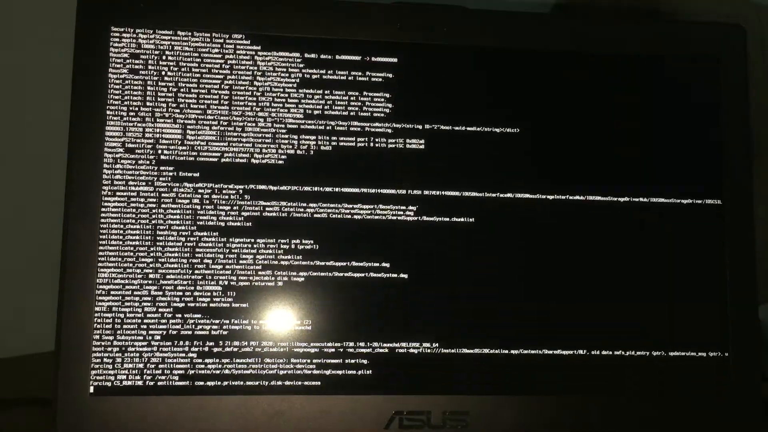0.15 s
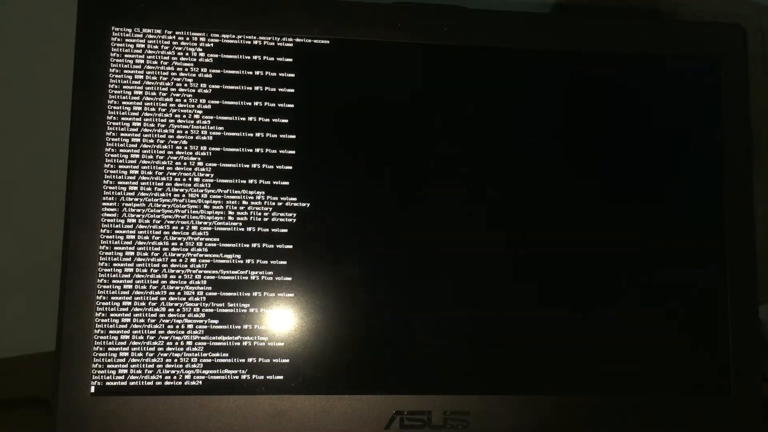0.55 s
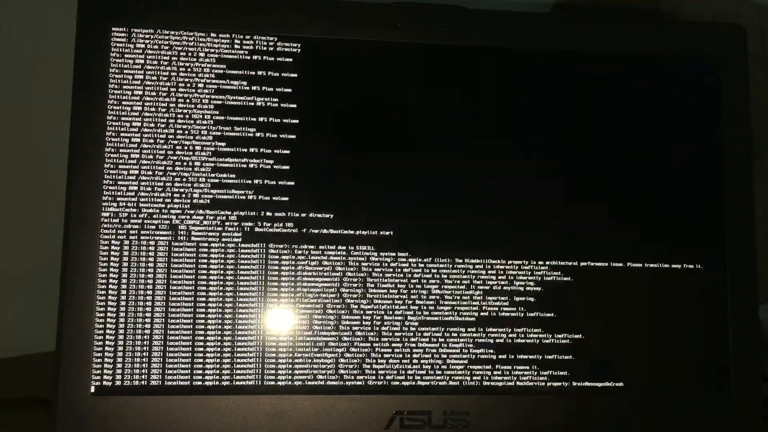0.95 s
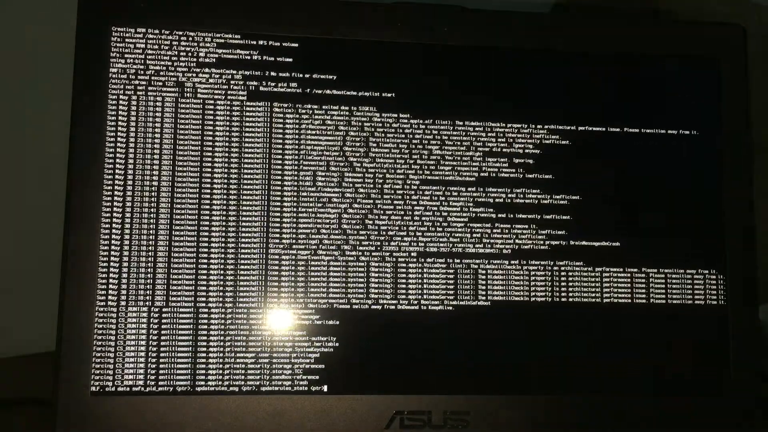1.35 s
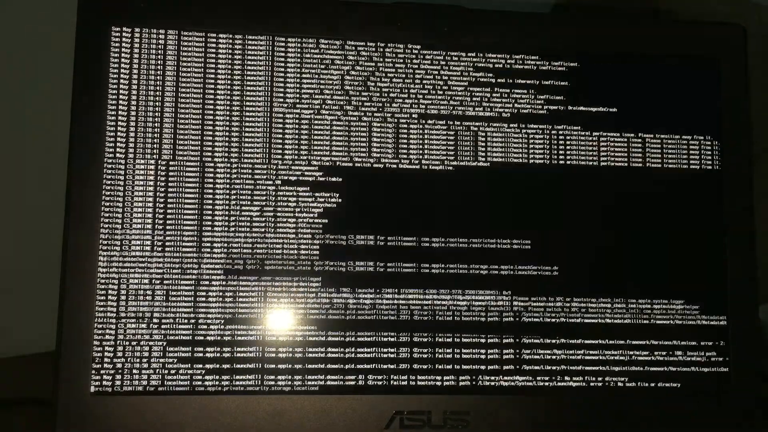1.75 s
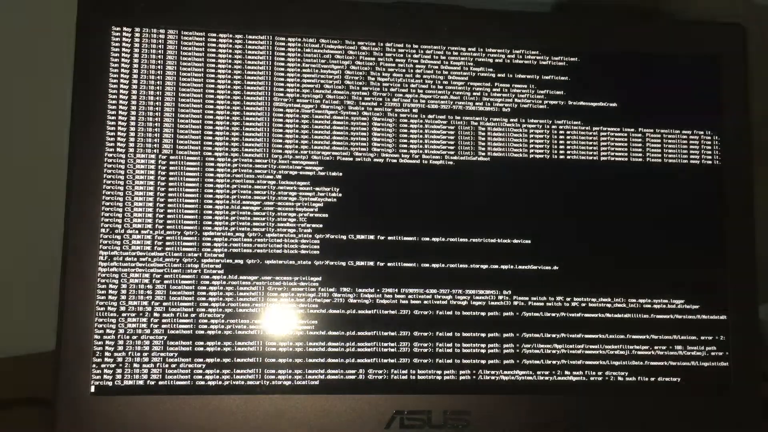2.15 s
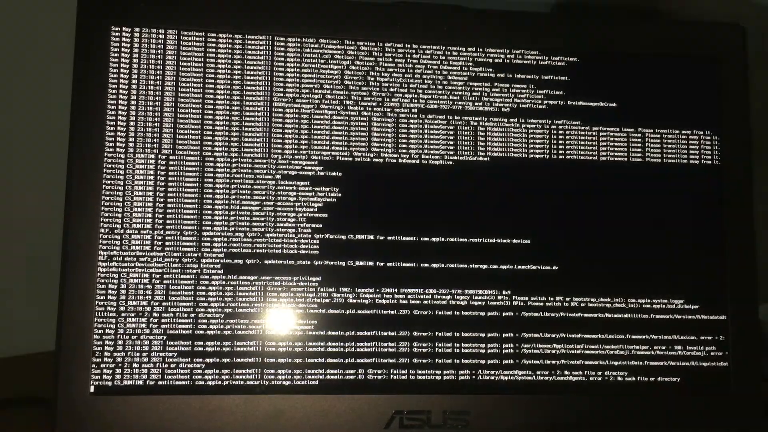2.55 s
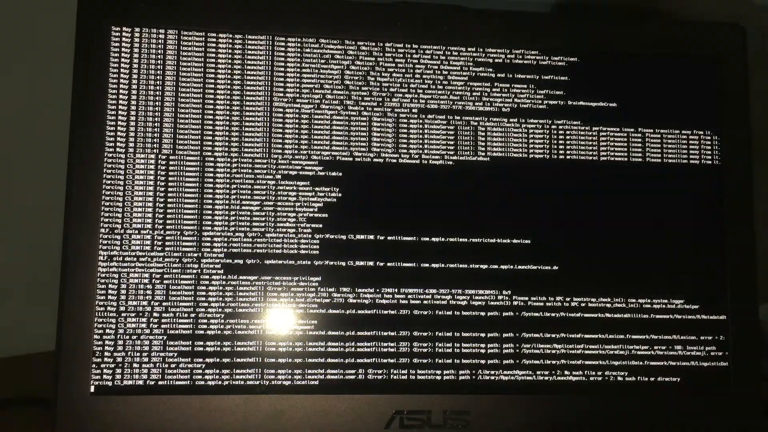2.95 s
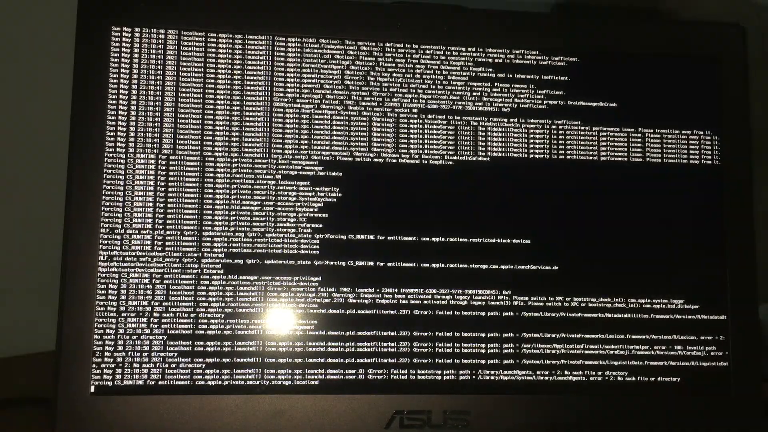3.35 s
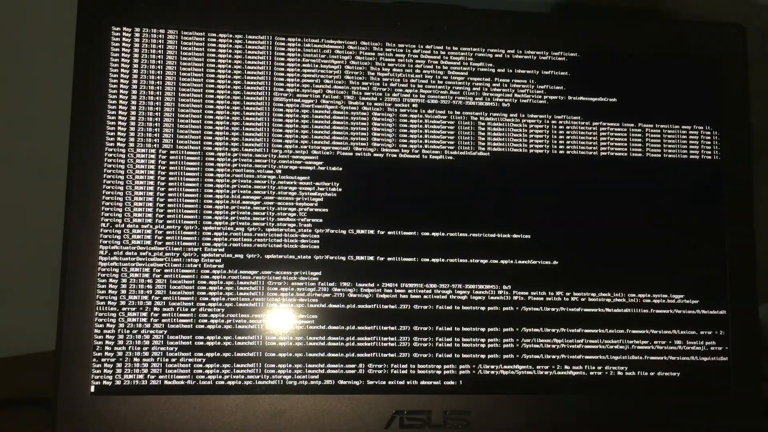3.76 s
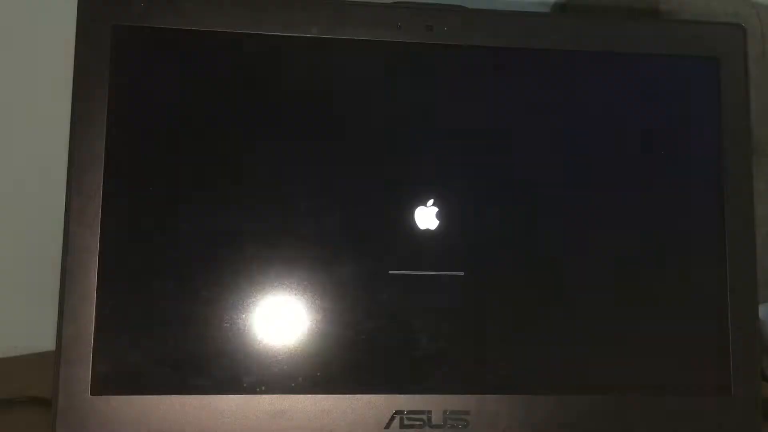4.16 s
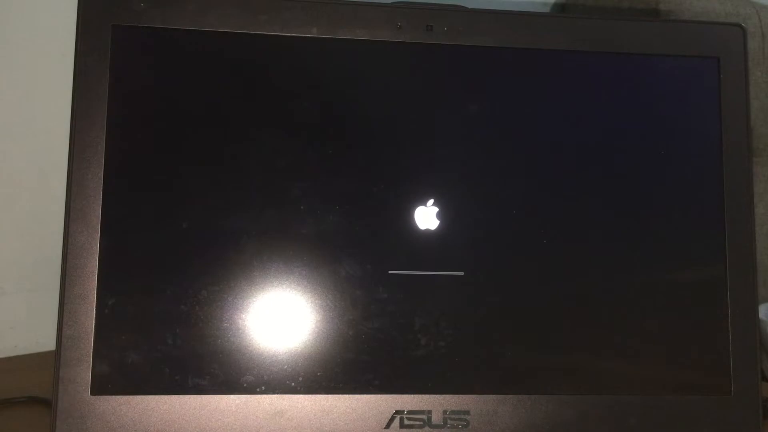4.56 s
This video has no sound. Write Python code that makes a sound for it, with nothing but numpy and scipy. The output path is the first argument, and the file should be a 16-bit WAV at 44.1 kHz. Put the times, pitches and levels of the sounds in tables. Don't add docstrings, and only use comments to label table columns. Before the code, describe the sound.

Close to an open laptop in a quiet room, fan air hisses steadily, focused in the middle treble, with thin constant whining tones. Faint low whistles swell briefly. Tiny creaks and snaps from the hand-held camera begin at once; sharper pops come around one second and again at two and a half. Small high ticks cluster near the end.

```python
import sys
import numpy as np
from scipy import signal
from scipy.fft import rfft, irfft, next_fast_len
from scipy.io import wavfile
from scipy.ndimage import uniform_filter1d, map_coordinates

SR = 44100
rng = np.random.default_rng(int(sys.argv[2]) if len(sys.argv) > 2 else 0)


def log_audio(samples):
    frames = np.atleast_2d(samples).T
    limited = np.clip(frames, -1, 1)
    pcm = np.round(limited * 32767).astype(np.int16)
    wavfile.write(sys.argv[1], SR, pcm)


def volts(x):
    e = np.asarray(x, float) / 20
    return 10 ** e


N = 208054
AIR_TOP_HZ, MIC_TOP_HZ = 15800, 16500

# pitch_hz, level_db (per Hz)
AIR_SPECTRUM = [(20, -100), (200, -101), (600, -99.5), (800, -86.5), (1100, -83.5), (1650, -90.5),
                (2200, -78), (3100, -69), (4200, -67), (5200, -77), (5800, -82.5), (7500, -88),
                (9500, -96.5), (15800, -96)]
# start_s, level_db
AIR_FLOW = [
    (0.0, -46),
    (0.47, -47),
    (1.4, -46.5),
    (3.15, -47),
    (3.97, -46.5),
    (4.72, -46.5),
]
DUCT_HZ = [740, 840, 1222, 1285, 1420, 1520, 1800, 2005, 2075, 2400, 2585, 2860, 2940, 3230, 3530, 3750,
           4020, 4330, 4590, 5300, 5685, 6424, 7510]
# width_hz, level_db (per Hz)
DUCT_SHAPES = [(50.4, -82.5), (29.5, -107), (23.7, -68.5), (73.6, -71.5), (240, -77.5), (80.4, -81),
               (204, -77.5), (18.4, -66), (89, -76), (104.4, -67.5), (100, -71.5), (77.5, -62), (74, -60.5),
               (74, -77.5), (100, -77), (207, -64.5), (40.2, -63), (61, -82.5), (210, -79), (130, -80),
               (49.4, -89.5), (120, -88), (122, -90.5)]
TONE_HZ = [977.7, 1187, 1322.8, 1889, 1921, 1943.8, 2350.5, 3065, 4019.5, 5470]
# level_db, wander_hz
TONE_LEVELS = [(-83.5, .5), (-82, .6), (-65, .5), (-84, .7), (-79.5, .7), (-75, 1.5), (-64, 1), (-78, 1.2),
               (-70, 4), (-86, 1.2)]
# start_s, pitch_hz, level_db
COIL = [
    (0, 1526, -67.5),
    (2.12, 1526, -67.5),
    (2.2, 1505, -74),
    (2.3, 1486.5, -71),
    (4.72, 1486, -71),
]
# centre_s, peak_db, half_length_s
SWELLS = [(0.03, -74, 0.058), (.175, -65, 0.0055), (0.252, -69.5, 0.042), (0.5, -75.5, 0.062),
          (.708, -71, .015), (1.51, -89, 0.028), (1.797, -72, 0.034), (1.993, -88, 0.017), (2.1, -75, 0.07),
          (2.23, -62, 0.0096), (2.303, -76, 0.079), (2.582, -62.5, 0.009), (2.778, -62.5, 0.01),
          (2.831, -60, 0.019), (3.232, -73, 0.0071), (3.542, -81, 0.055), (3.737, -75, .03),
          (3.814, -67, 0.013), (3.859, -66.5, 0.018), (3.9, -67, 0.0087), (4.024, -68, 0.01),
          (4.087, -71, 0.02), (4.264, -72, 0.027), (4.546, -66, 0.011), (4.61, -80, 0.035)]
# start_s, length_s, start_hz, middle_hz, end_hz
GLIDES = [
    (1.92, .075, 946, 847, 795),
    (2.39, .22, 800, 842, 790),
]
# start_s, peak_db
ARM_MOVES = [
    (0.229, -42),
    (3.5853, -42),
    (3.706, -41.5),
    (3.7973, -42.5),
    (3.885, -40.5),
    (4.513, -40.5),
]
# pitch_hz, level_db, decay_s (time to fall 60 dB)
ARM_MODES = [(9510, -3, .026), (11300, -4, .016), (10500, -6, .013), (12200, -7, .012), (13300, -7, .012),
             (8300, -10, .012)]
# centre_s, peak_db, pitch_hz, half_length_s
POPS = [(.627, -50, 880, .002), (.8283, -35, 2500, .0019), (1.2684, -29.5, 2350, .00105),
        (1.5186, -46, 750, .0007), (1.52, -57, 420, .003), (1.9839, -46.5, 700, .0009),
        (1.987, -60, 315, .005), (2.0712, -39, 1550, .00055), (2.245, -66, 660, .002),
        (2.5017, -30, 2150, .00038), (2.507, -42, 2500, .002), (2.543, -38, 2900, .0005)]
# start_s, peak_db,
# brightness_hz, length_s
CREAKS = [(0.0577, -39.5, 12000, 0.0061), (0.091, -51, 14000, 0.0048), (.1207, -52.5, 13000, 0.0033),
          (.1737, -48.5, 13000, 0.0055), (1.0935, -62, 11000, .005), (1.192, -48, 8550, 0.0039),
          (1.238, -61, 13500, .005), (1.517, -47, 14700, 0.0059), (1.9823, -40.5, 15600, 0.0066),
          (2.175, -54.5, 13000, .004), (2.5009, -30.5, 13100, 0.0011), (2.5024, -36, 14000, 0.0048),
          (2.506, -51, 6000, 0.022), (3.097, -51, 13700, 0.0056), (3.862, -59, 15500, .003)]
# start_s, peak_db, brightness_hz
SNAPS = [(.093, -53, 12000), (.1925, -59, 12000), (.248, -52, 15000), (.268, -63, 13000),
         (.294, -59, 12000), (.306, -52, 12500), (.407, -56, 15500), (0.5798, -56.5, 11000),
         (0.691, -56, 15000), (.7088, -59, 14000), (1.188, -60, 9800), (1.268, -54, 15100),
         (1.58, -50, 6800), (2.2425, -59, 11000), (2.383, -56, 8400), (2.488, -52, 9000),
         (2.494, -58, 13000), (2.535, -52, 7450), (2.625, -55, 10600), (2.8605, -50, 14000),
         (2.9435, -49, 12100), (3.152, -55, 14600), (3.158, -57, 14200), (3.16, -43, 14800),
         (3.26, -63, 13000), (3.849, -48, 15000), (3.8755, -45, 14700), (3.934, -57, 12000),
         (3.957, -54, 8900)]
# centre_s, peak_db, direction (+1 inward, -1 outward), width_s, body_ring_hz
PUSHES = [(0.0583, -41.5, -1, 0.00023, 296), (0.066, -56, 1, 0.00071, 198), (.121, -59, -1, 0.00042, 297),
          (0.174, -51, -1, 0.00029, 286), (0.192, -64, -1, 0.00043, 300), (0.463, -64.5, 1, 0.00034, 400),
          (1.095, -55, -1, 0.00015, 540), (1.518, -51, -1, 0.00053, 390), (1.526, -63, 1, 0.00074, 200),
          (1.58, -73, -1, .0007, 300), (1.9843, -58.5, 1, 0.00086, 317), (2.175, -67, -1, 0.00046, 500),
          (2.49, -56, 1, 0.0004, 304), (2.504, -68, 1, 0.00076, 250), (2.625, -59, 1, 0.00029, 345),
          (3.098, -62.5, -1, 0.00031, 455), (3.8517, -62, 1, .0004, 500), (3.874, -66, -1, 0.00066, 250),
          (3.934, -62, -1, 0.00045, 248)]


def unit(x):
    return x / np.sqrt(np.mean(x ** 2) + 1e-20)


def curves(rows):
    times, *columns = np.transpose(rows)
    return [np.interp(np.arange(N) / SR, times, column) for column in columns]


def wobble(rate):
    knots = rng.standard_normal(int(N * rate / SR) + 4)
    return map_coordinates(knots, [np.arange(N) * rate / SR])


def tone(hz):
    cycles = np.cumsum(hz) / SR + rng.random()
    return np.sqrt(2) * np.sin(2 * np.pi * cycles)


def add(track, s, x):
    track[round(s * SR):][:len(x)] += x


def air():
    noise = signal.stft(rng.standard_normal(N), nperseg=256)[2]
    patches = uniform_filter1d(rng.standard_normal(noise.shape), size=5, axis=0)
    patches = uniform_filter1d(patches, size=4, axis=1)
    eddies = signal.istft(noise * volts(1.31 * unit(patches)), nperseg=256)[1][:N]
    eddies = eddies * volts(1.35 * wobble(400) + 0.18 * wobble(6.59))

    size = next_fast_len(N)
    f = np.fft.rfftfreq(size, 1 / SR)
    hz, db = np.transpose(AIR_SPECTRUM)
    power = volts(2 * np.interp(np.log(f + 1), np.log(hz), db))
    for centre, (width, peak_db) in zip(DUCT_HZ, DUCT_SHAPES):
        power = power + volts(2 * peak_db) / (1 + (2 * (f - centre) / width) ** 4)
    hiss = irfft(rfft(eddies, size) * np.sqrt(power) * (f < AIR_TOP_HZ), size)[:N]
    flow_db, = curves(AIR_FLOW)
    return volts(flow_db - 0.84) * unit(hiss)


def whine():
    out = np.zeros(N)
    for hz, (db, wander) in zip(TONE_HZ, TONE_LEVELS):
        strength = volts(db + 1.76 * wobble(6.4) + 1.7 * wobble(18))
        out += strength * tone(hz + wander * wobble(8))
    coil_hz, coil_db = curves(COIL)
    return out + volts(coil_db) * tone(coil_hz + 0.39 * wobble(8.6))


def whistle():
    t = np.arange(N) / SR
    level = volts(-81)
    for s, db, half in SWELLS:
        level = level + volts(db) * np.exp(-((t - s) / half) ** 2)
    out = level * volts(0.92 * wobble(35)) * tone(731.5 + 2.7 * wobble(20))
    for s, length, *bend_hz in GLIDES:
        progress = np.clip((t - s) / length, 0, 1)
        arc_hz = np.polyval(np.polyfit([0, .5, 1], bend_hz, deg=2), progress)
        swell = np.abs(np.sin(np.pi * progress)) ** .8 * (progress < 1)
        out = out + volts(-70 + 2.6 * wobble(30.2)) * swell * tone(arc_hz)
    return out


def arm_ticks():
    out, t = np.zeros(N + SR), np.arange(2048) / SR
    onset = 1 - np.exp(-t / 0.002)
    for s, db in ARM_MOVES:
        ring = np.zeros(len(t))
        for hz, level_db, decay in ARM_MODES:
            rough = 1 + 2 * uniform_filter1d(rng.standard_normal(len(t)), size=16)
            ring += volts(level_db - 60 * t / decay) * rough * np.sin(2 * np.pi * hz * t)
        add(out, s, volts(db - 4.5) * ring * onset)
    return out[:N]


def shell_pops():
    out, t = np.zeros(N + SR), np.arange(2048) / SR - .01
    for s, db, hz, half in POPS:
        sag = 1 - 30 * np.clip(t, -half, half)
        burst = np.exp(-np.abs(t / half) ** 3)
        pop = -volts(db) * burst * np.sin(2 * np.pi * hz * t * sag)
        add(out, s + t[0], pop)
        add(out, s + t[0] + 0.00346, volts(-11.5) * pop)
    return out[:N]


def creaks():
    out, t = np.zeros(N + SR), np.arange(-64, 4032) / SR
    f = np.fft.rfftfreq(len(t), 1 / SR)
    after = np.maximum(t, 0)
    onset = 1 - np.exp(-after / 0.000083)
    snaps = [(*snap, 0.0013) for snap in SNAPS]
    for s, db, hz, length in [*CREAKS, *snaps]:
        slips = volts(0.3869 * uniform_filter1d(rng.standard_normal(len(t)), size=9))
        tail = volts(-29 - 60 * after / 0.065)
        shape = slips * np.exp(-(after / length) ** 2) + tail
        crack = rng.standard_normal(len(t)) * shape * onset
        broad = np.clip(200 * length - .05, .2, 1) + volts(db + 25)
        colour = (broad + 1 / (1 + ((f - hz) / 2200) ** 4)) * f / (f + 2000)
        crack = irfft(rfft(crack) * colour)
        add(out, s + t[0], volts(db + 7.5) * crack / np.abs(crack).max())
    return out[:N]


def pushes():
    out, t = np.zeros(N + SR), np.arange(-64, 4032) / SR - .01
    for s, db, direction, width, hz in PUSHES:
        lump = np.exp(-(t / width) ** 2)
        fade = volts(-60 * np.abs(t) / 0.014) * (1 - lump) * (t > 0)
        rebound = 0.34 * fade * np.cos(2 * np.pi * hz * t)
        sag = 0.1 * np.exp(-((t - .002) / 0.0033) ** 2)
        add(out, s + t[0], np.sign(direction) * volts(db) * (lump + rebound - sag))
    return out[:N]


def scene():
    laptop = air() + whine() + whistle() + arm_ticks() + shell_pops()
    camera = creaks() + pushes()
    return (laptop + camera)[None]


def roll_off(x):
    return signal.sosfilt(signal.butter(12, 16510, fs=SR, output="sos"), x)


def record(dry):
    f = np.fft.rfftfreq(N, 1 / SR)
    edge = volts(-22 * np.clip((f - AIR_TOP_HZ) / 100 + .5, 0, 1)) * (f < MIC_TOP_HZ)
    mix = irfft(rfft(dry) * edge, N)
    return roll_off(mix)


dry = scene()
out = record(dry)
log_audio(out)
```